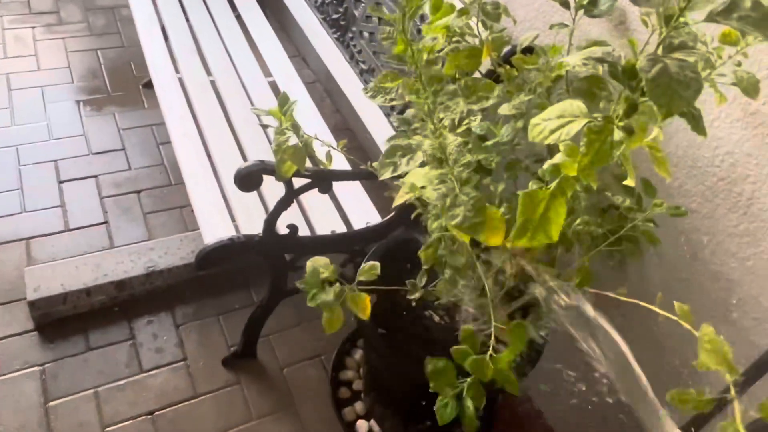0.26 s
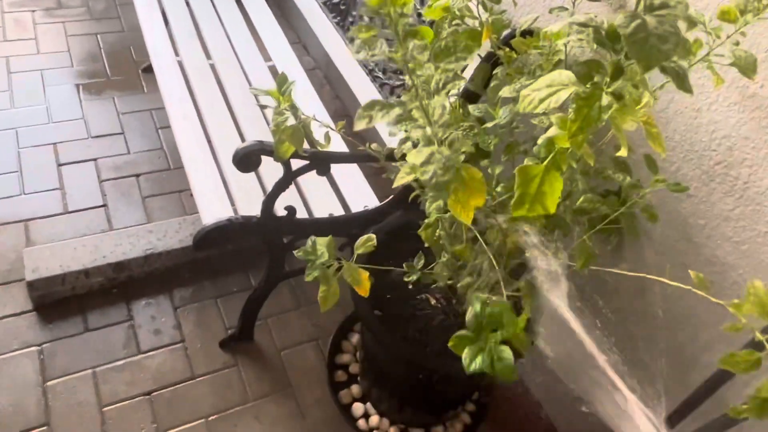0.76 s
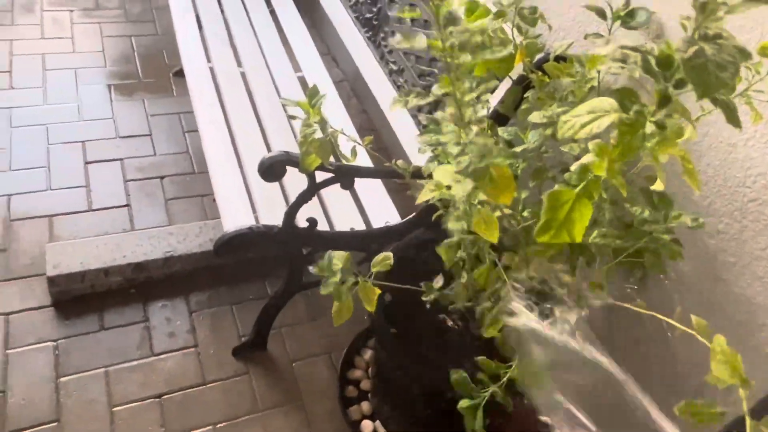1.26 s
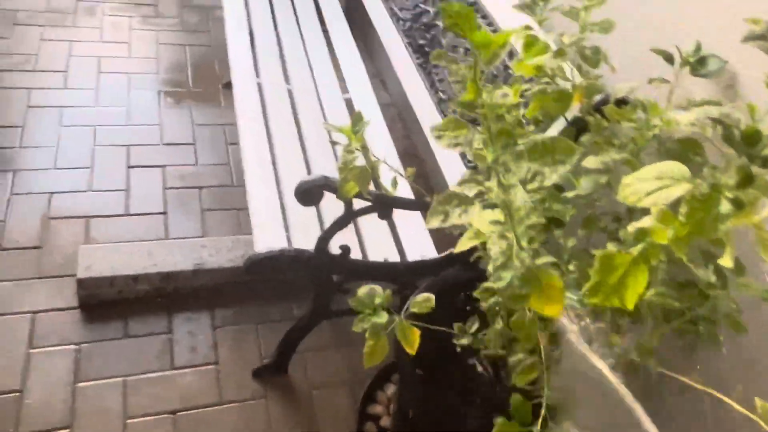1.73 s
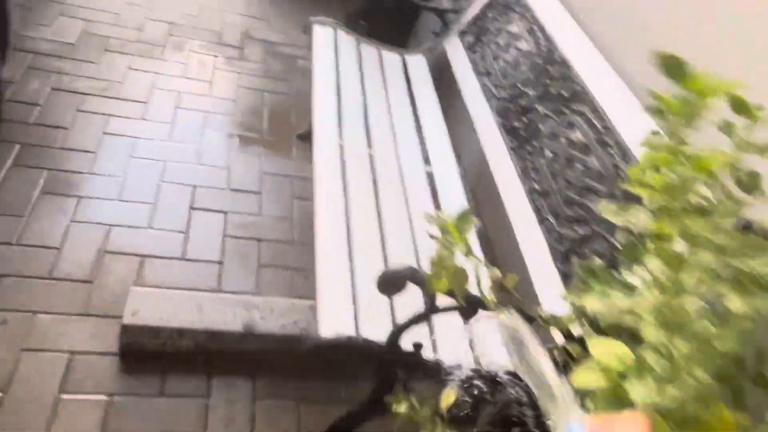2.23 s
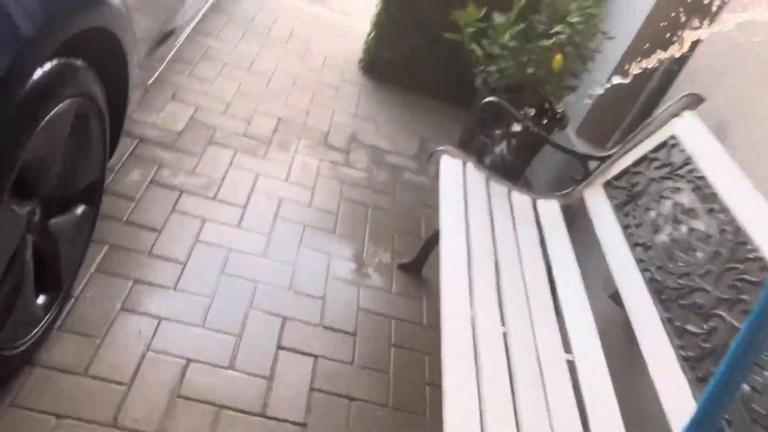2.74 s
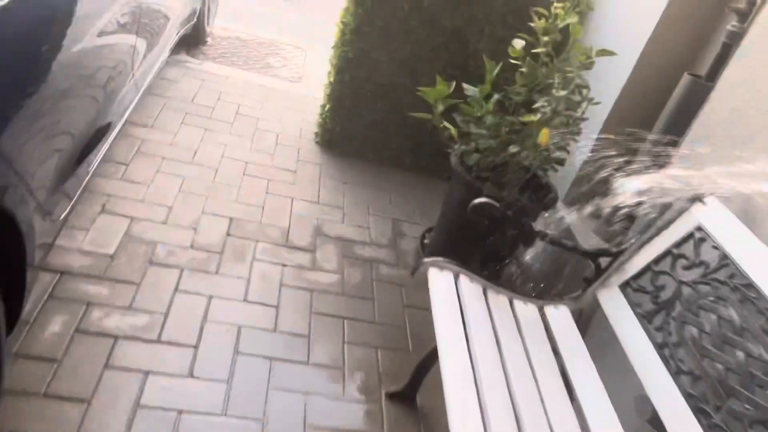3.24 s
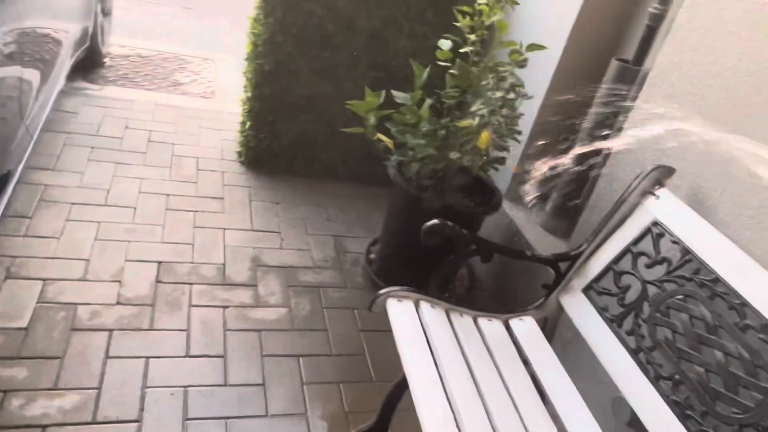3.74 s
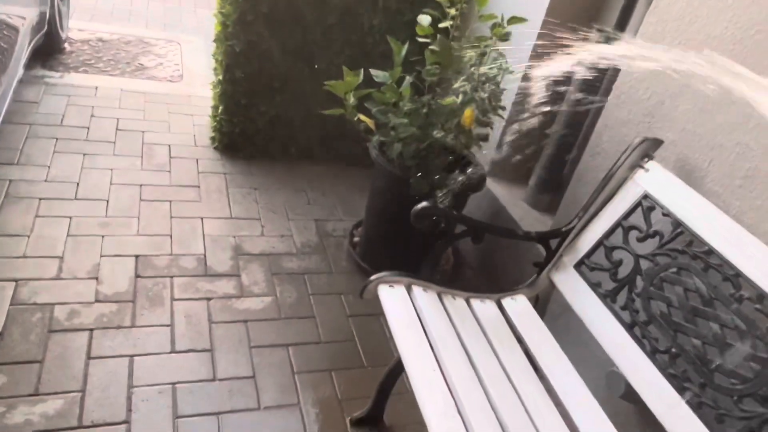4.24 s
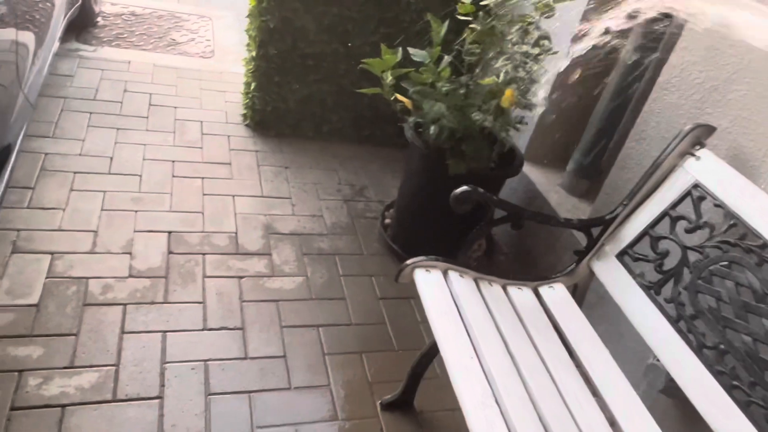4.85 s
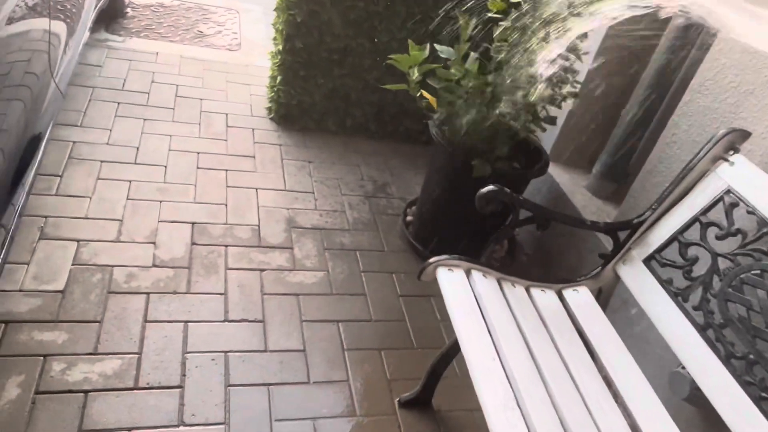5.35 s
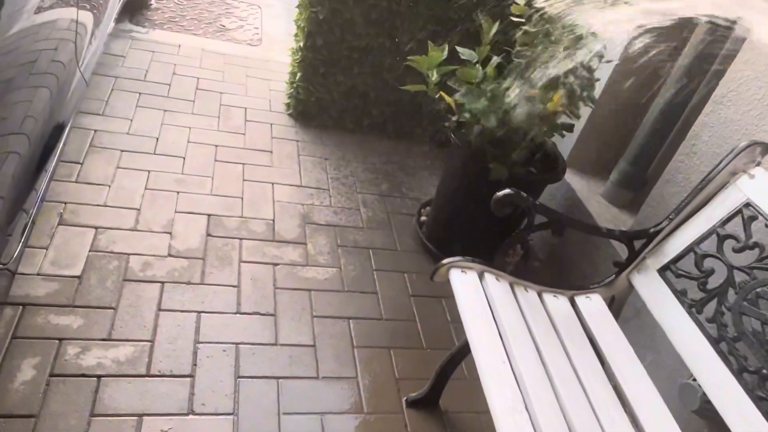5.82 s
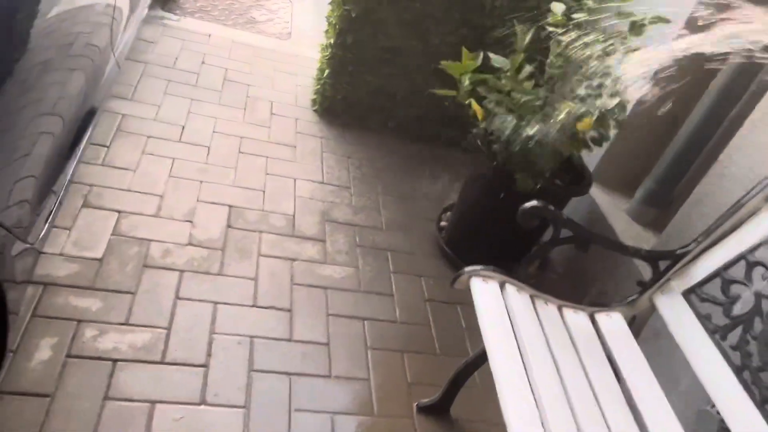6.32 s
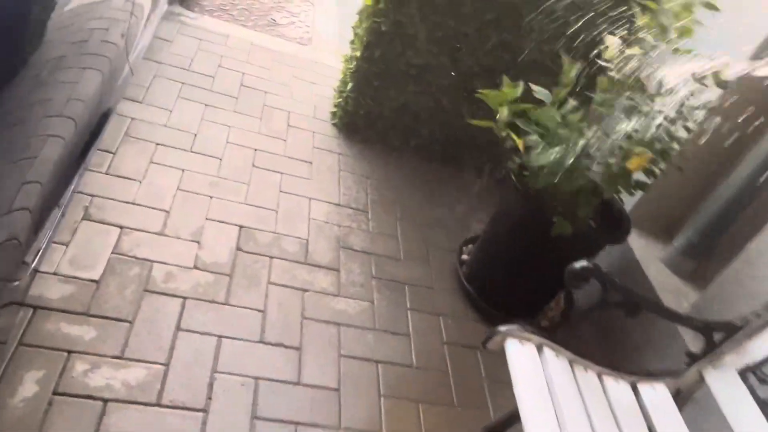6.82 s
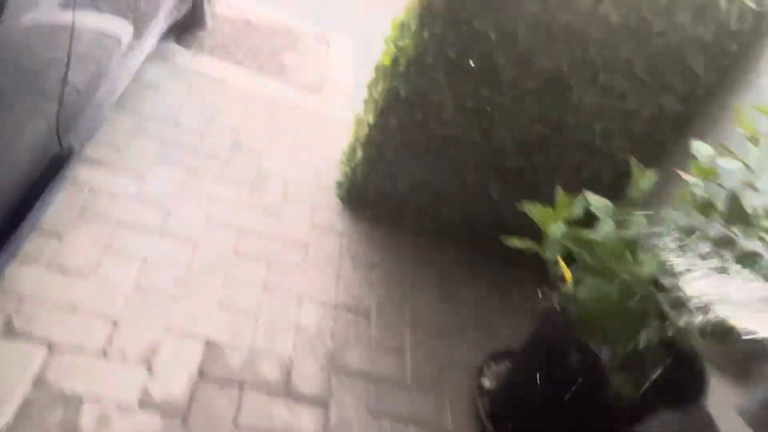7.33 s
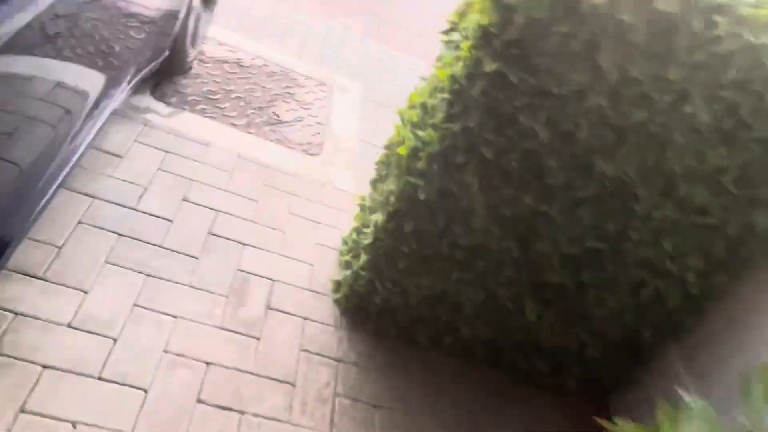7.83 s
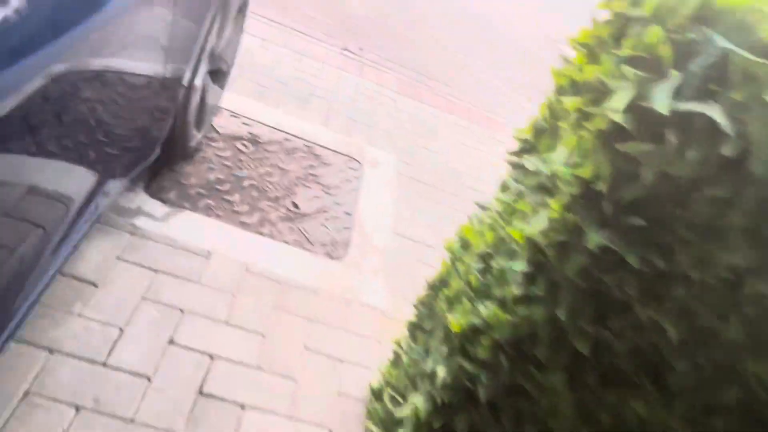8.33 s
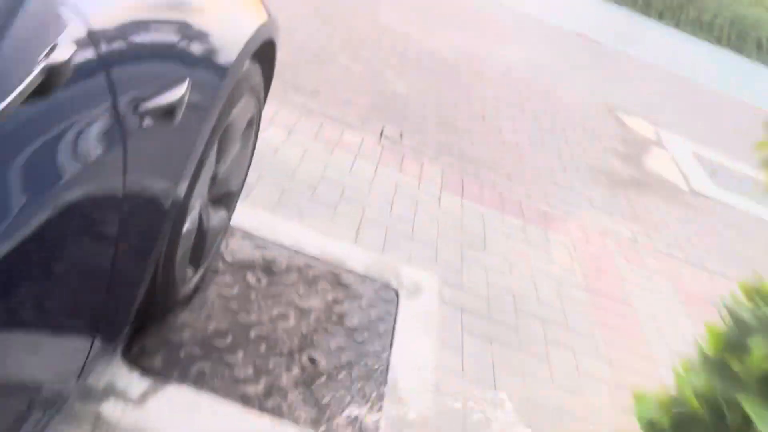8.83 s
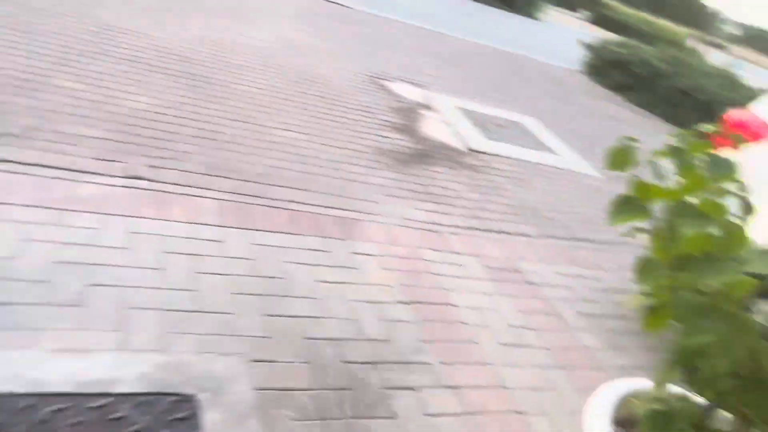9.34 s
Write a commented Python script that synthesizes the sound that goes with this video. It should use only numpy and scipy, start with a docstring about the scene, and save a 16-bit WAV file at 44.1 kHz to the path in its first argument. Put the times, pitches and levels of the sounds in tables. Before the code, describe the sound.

Close hand-held stereo on a hard-walled patio: a hose stream patters on leaves, drums on potted soil and splashes paving. Sharp leaf slaps cluster in the first second, the water thins, then short gushes and bubbly gurgles follow at a second pot. Near the end heavy drops tick on leaves close by. Underneath lie an unsteady deep motor hum, low street rumble, faint distant hoots and a few soft microphone bumps.

```python
"""Water patters and slaps on leaves, drums on soil and splashes on paving: a hose moves from pot to pot.
Drops are noise bursts, bubbles are short rising sines, slaps are cracks with a leaf ring, and pots are
ringing modes. A machine hums in unsteady sines, over low street noise and faint far-off hoots.
Soft bumps on the hand-held stereo microphone are dull pulses with a wobble and a rub."""
import sys
import numpy as np
from scipy import signal
from scipy.fft import rfft, irfft, next_fast_len
from scipy.io import wavfile

SR = 44100
rng = np.random.default_rng(int(sys.argv[2]) if len(sys.argv) > 2 else 0)


def materialize(psi):
    """Save the field psi as 16-bit PCM at rate SR to the path in sys.argv[1].

    A 1-D psi becomes a single channel; in a 2-D psi each row is a channel.
    """
    bounded = np.clip(np.atleast_2d(psi).T, -1, 1)
    quanta = np.round(bounded * 32767).astype(np.int16)
    wavfile.write(sys.argv[1], SR, quanta)


N = 422037
TIME = np.arange(N) / SR
PADDED = next_fast_len(N + SR)
BIN_HZ = np.maximum(np.arange(PADDED // 2 + 1) * SR / PADDED, 1)

# Levels are relative dB unless stated otherwise.
# Steady patter on leaves. Each row: time in seconds, level in dB.
PATTER_LEVEL = [(0, -43.5), (.8, -55), (1.8, -47), (2.35, -52.5), (2.47, -56.5), (3.0, -54.5), (3.4, -53.5),
                (4.55, -50.5), (5.1, -49.5), (5.55, -50.5), (6.7, -48.5), (7.8, -47), (8.03, -50.5),
                (8.57, -54), (8.75, -45.5), (9.57, -42)]
# Steady splash on hard ground. Each row: time in seconds, level in dB.
GROUND_LEVEL = [(0, -53), (1.8, -56), (2.65, -59), (3.5, -52), (4.6, -56), (5.6, -55.5), (7.5, -53.5),
                (8.15, -56), (9.57, -53.5)]
# Stream sweeping through a shrub. Each row: start in seconds, length in seconds, patter in dB,
# splash against patter in dB, spray against patter in dB.
SWEEPS = [(.11, 0.02, -43.5, -7, -15), (.3, 0.023, -43.5, -13, -3), (.375, 0.034, -41.5, -23, -14),
          (.47, 0.025, -44.5, -11, -11), (.54, 0.045, -45, -3.5, -18), (.625, 0.2, -44, -28, -7),
          (.9, 0.12, -46.5, -19, -2), (1.14, 0.15, -48.5, -6, -2.5), (1.44, 0.064, -49, -1.5, -6),
          (2.06, 0.031, -45, -27, -0.5), (2.19, 0.15, -42, -8.5, -8.5), (2.51, 0.062, -46.5, -23, -5.5),
          (2.722, 0.031, -38.5, -8.5, -8), (2.85, 0.11, -52, -3, -7), (3.072, 0.12, -40, -7.5, -8.5),
          (3.2, 0.15, -33.5, -7, -13), (3.38, 0.043, -42.5, 1.5, -11), (3.475, 0.036, -39.5, -1, -8),
          (3.68, 0.042, -40.5, -4.5, -7.5), (3.845, .13, -41, -7.5, -9.5), (4.055, 0.12, -40.5, -7, -7.5),
          (4.27, 0.082, -45, -3.5, -6.5), (4.75, 0.15, -51, -5.5, -8), (4.878, 0.059, -45, -1, -6),
          (4.97, 0.038, -42, -10, -6), (5.08, 0.022, -41.5, -5.5, -21), (5.7, 0.028, -43.5, -7.5, -8),
          (6.19, 0.059, -47.5, -4, -0.5), (6.32, 0.058, -42, -14, -6), (6.8, 0.092, -49.5, -9, -4.5),
          (6.97, 0.071, -57, -4, 6), (7.17, 0.048, -51, -3, 1.5), (7.25, 0.067, -50, -4, 3),
          (7.3, 0.095, -41.5, -6.5, -18), (7.63, 0.12, -40.5, -11, -9.5), (7.86, 0.077, -44.5, -8, -11),
          (8.085, 0.044, -39, -17, -7), (8.22, 0.081, -39.5, -8.5, -6.5), (8.35, 0.069, -40.5, -5, -0.5),
          (8.425, 0.045, -39.5, -6.5, -20), (8.59, 0.055, -37.5, -17, -2)]
SWEEP_ATTACK_S, SWEEP_FALL_DB_PER_S = 0.02, 138
SPRAY_VS_PATTER_DB, FLUTTER_SPREAD_DB, FLUTTER_HZ = -5.5, 0.5, 39
# Steady trickle into pots. Each row: time in seconds, drumming on earth in dB, sploshing in pools in dB.
SOIL_LEVELS = [(0, -46, -47.5), (.7, -50, -50), (1.1, -47.5, -49), (2.35, -49.5, -48.5),
               (2.65, -53.5, -58.5), (3.15, -53, -47), (4.35, -55, -46), (4.65, -53, -64.5),
               (5.0, -53, -54), (6.0, -53, -57), (7.05, -51.5, -54), (7.9, -49.5, -53), (8.7, -56.5, -81),
               (9.57, -57.5, -74)]
# Full stream plunging into a pot. Each row: start in seconds, length in seconds, drumming in dB,
# sploshing against drumming in dB.
PLUNGES = [(1.15, 0.11, -53.5, 6), (1.38, 0.058, -45, -4), (1.69, 0.045, -49, -1), (2.86, 0.17, -59.5, 10),
           (3.34, 0.056, -62, 9), (3.68, 0.041, -44.5, -2), (3.9, 0.052, -52.5, 12.5),
           (4.09, 0.088, -53, 9.5), (4.27, 0.19, -55, 8.5), (6.37, 0.071, -50.5, -12),
           (7.17, 0.17, -47.5, -5), (7.47, 0.027, -58.5, 9), (7.63, 0.11, -51, 5.5), (8.25, 0.13, -55, 6),
           (8.42, 0.05, -44.5, -1)]
PLUNGE_ATTACK_S, PLUNGE_FALL_DB_PER_S = 0.0077, 215
# Hollow dug in pooled water, lower when deep. Each row: time in seconds, resonance in Hz.
HOLLOW_PITCH = [(0, 900), (2.89, 880), (2.98, 1150), (3.13, 1450), (3.6, 1250), (3.74, 1060), (3.96, 1310),
                (4.08, 1200), (4.14, 830), (4.21, 1100), (4.37, 980), (4.6, 1150)]
HOLLOW_WIDTH_HZ, HOLLOW_WANDER_RATIO, HOLLOW_VS_SPLOSH_DB = 395, .04, -4
# Gouts slapping leaves and, near the end, heavy single drops ticking on leaves.
# Each row: start in seconds, level in dB, leaf ring in Hz, scattered droplets against the crack in dB.
SLAPS = [(.132, -26, 5200, 8), (.1915, -29, 9200, 2), (.317, -26.5, 4100, 9), (.3848, -19.5, 4500, 9),
         (.5417, -18, 4100, 4), (.5505, -22, 4000, 2), (.5651, -19.5, 4200, 4), (.574, -24, 3700, 4),
         (.6372, -17, 5200, 4), (.6495, -23, 4700, 2), (.683, -23, 4600, 2), (.7255, -27, 4000, 0),
         (.744, -28, 4400, 2), (.9203, -20, 8600, 6), (1.4865, -25, 8000, 0), (1.8472, -26, 6500, -2),
         (2.1949, -25, 4800, 6), (2.212, -24, 10000, 0), (2.547, -31, 4500, 8), (2.58, -30, 4400, 9),
         (2.6993, -29, 6000, 7), (2.7257, -19.5, 4400, 8), (2.77, -24, 4200, 9), (3.2126, -18, 4150, 7),
         (3.3099, -21, 4000, 13), (6.3525, -25, 5400, 6), (7.6525, -17, 7400, 7), (8.0726, -23, 5300, 8),
         (8.1135, -22, 4130, 6), (8.128, -24, 3000, 3), (8.2072, -29, 4300, 7), (8.3644, -23, 4700, 7),
         (8.379, -20, 2500, 0), (8.3873, -14.5, 2750, 2), (8.404, -23, 3600, 2), (8.5819, -26, 5000, 8),
         (8.6733, -23, 3300, 0), (8.7299, -21, 5150, 0), (8.7801, -25, 4100, 0), (8.8313, -22, 4150, 3),
         (8.8631, -24, 3400, 2), (8.9321, -17, 5800, 5), (8.9806, -25, 3200, -3), (8.989, -19.5, 3200, -3),
         (9.0445, -25, 3050, 0), (9.0538, -17.5, 4700, 2), (9.0986, -23, 5900, 0), (9.1885, -19, 2600, 4),
         (9.2643, -16, 5900, 0), (9.2953, -18.5, 3000, 3), (9.3422, -18.5, 9000, -2),
         (9.3635, -21, 5750, 0), (9.3841, -20.5, 3600, 3), (9.4351, -24, 3800, 0), (9.4917, -22, 5300, 0),
         (9.5106, -22, 5700, 0), (9.5437, -20, 3300, 3)]
# Stream striking a pot, and one light tick at 9.07 s. Each row: start in seconds, level in dB, lower band edge
# in Hz, # upper band edge in Hz, hard push against the splat in dB.
KNOCKS = [(.393, -31, 1000, 2000, 0), (.4, -29, 950, 1900, 3), (.418, -32, 900, 2100, 0),
          (.468, -35, 650, 1250, 3), (2.3505, -30.5, 380, 1500, 27), (2.3542, -28, 500, 1350, 30),
          (2.36, -29, 330, 1300, 8), (2.377, -33.5, 560, 1450, 12), (2.898, -29, 750, 1050, 24),
          (2.920, -32, 850, 1700, 14), (8.436, -34, 500, 2600, 17), (9.072, -36, 620, 880, 24)]
# Modes of a pot, lowest first. Each row: frequency in Hz, level in dB, 60 dB decay in seconds.
POT_MODES = [(335, -7.5, 0.53), (420, -16, 0.0068), (554, -28, 0.024), (816, 18, 0.01), (1080, 19, 0.0093)]
# Lowest pot mode driven by the stream. Each row: start in seconds, length in seconds, peak in dB.
BOOMS = [(1.38, 0.14, -44), (1.593, 0.14, -51), (1.875, 0.087, -49), (4.37, 0.044, -44), (7.185, .14, -51)]
# Broad leaf buzzing under the stream. Each row: start in seconds, length in seconds, peak in dB, ring in Hz.
BUZZES = [(0.539, 0.059, -39, 3660), (3.27, .12, -36, 3910), (3.478, 0.071, -51, 2960),
          (4.949, 0.13, -39, 3560), (8.365, 0.12, -42, 2380)]
BUZZ_WIDTH_HZ, BUZZ_SAG_OCTAVES = 810, 0.27
# Big bubbles in the pots. Each row: start in seconds, level in dB, starting pitch in Hz.
PLOPS = [(2.897, -35, 860), (3.353, -39, 1027), (3.723, -35, 1030), (3.938, -30, 1190), (4.125, -35, 736),
         (4.32, -33, 895), (8.434, -23, 2050)]
# cycles are those of the starting pitch during a 60 dB fall
PLOP_ATTACK_S, PLOP_CYCLES, PLOP_PHASE_STRETCH = .002, 52, 0.18
# Heavy single drops on the hedge close by. Each row: time in seconds, level in dB.
HEDGE_LEVEL = [(0, -90), (8.5, -86.5), (8.7, -39), (9.57, -32)]
# Bumps on the microphone. Each row: start in seconds, level in dB, softness of the push in seconds.
BUMPS = [(2.264, -33.5, 0.0042), (7.814, -33, 0.0041), (9.076, -37, 0.0023), (9.1385, -21.5, 0.0024)]
WOBBLE_HZ, WOBBLE_PEAK_S, RUB_DB = 58, .026, -19
# Machine hum. Each row: time in seconds, deep hum in dB, upper hum in dB.
HUM_LEVELS = [(0, -49, -57), (.6, -49, -50), (.95, -48, -53), (1.15, -50, -49.5), (1.6, -44, -47),
              (1.98, -52, -53.5), (2.21, -51, -45), (2.45, -52, -56), (3.4, -40, -75), (4.95, -39, -54),
              (5.7, -40, -74), (6.95, -38, -73), (7.25, -35, -52), (8.4, -35.5, -60), (9.15, -38.5, -67),
              (9.57, -44.5, -54)]
THROB_PERIOD_S, THROB_CREST_S, THROB_DB = 0.765, 4.22, 1.4
# Second drone beating against the hum. Each row: time in seconds, pitch in Hz, level in dB.
DRONE = [(0, 72.7, -66), (.3, 77.3, -48), (.55, 82, -58), (.9, 78.9, -63), (1.18, 76.5, -48),
         (1.55, 74.2, -51), (1.9, 72.6, -66), (3, 74, -90)]
# Faint far-off hoots, perhaps a dove. Each row: start in seconds, length in seconds, pitch in Hz, peak in dB.
HOOTS = [(.1, 0.3, 542, -51.5), (1.12, 0.14, 534, -44.5), (1.84, 0.13, 548, -47.5),
         (5.141, 0.2, 557, -51.5), (8.555, 0.21, 552, -49.5), (8.93, 0.35, 527, -56.5),
         (8.89, 0.2, 204.3, -46)]
# Street rumble. Each row: time in seconds, level in dB.
STREET_LEVEL = [(0, -51), (2.6, -52.5), (4.5, -50.5), (7, -50), (9, -47), (9.57, -50)]
# Spectra of the layers. Each row: frequency in Hz, gain in dB.
SOIL_COLOUR = [(120, -6), (240, -5.5), (350, 0.5), (550, 1.5), (750, -4.5), (1100, -45), (2500, -15)]
POOL_COLOUR = [(350, -4.5), (650, -7), (850, -1.5), (1100, -8.5), (1400, 2.5), (1800, -1), (3000, -9)]
SPLASH_COLOUR = [(700, -11.5), (1300, 1), (1800, 1.5), (2300, 3), (2900, 3), (3900, 1.5), (7000, -23)]
LEAF_COLOUR = [(1500, -27), (2600, -11), (3400, -3.5), (4300, 4), (5400, 2), (6500, -4.5), (8500, -10.5),
               (14000, -18)]
SPRAY_COLOUR = [(3500, -24.5), (6000, -0.5), (7500, 3), (9000, 1), (11000, 2.5), (13000, -6), (15500, -4)]
HEDGE_COLOUR = [(800, -20), (1600, -6.5), (2700, -4.5), (5500, 1.5), (10000, -2), (15000, 2.5)]
STREET_COLOUR = [(20, -25), (40, -0.5), (70, 4.5), (125, 2.5), (175, -2), (240, -7.5), (320, -18.5),
                 (430, -13.5), (1000, -26), (4000, -39)]
# Reflections from walls and paving. Each row: frequency in Hz, level against the direct sound in dB.
REFLECTED = [(150, -21), (500, -5.5), (1000, -1.5), (2000, 7), (5000, 6), (6500, 4), (7800, -4),
             (9000, -12), (16000, -6)]
LATE_SHARE, LATE_S = 0.48, 0.035
WALL_DELAY_S, WALL_SWAY_S, WALL_DB = .0042, 0.00027, -12.5
# Phase difference between left and right. Each row: frequency in Hz, lead of the left in radians.
STEREO_PHASE = [(50, 0), (1000, -1.1), (4200, -3.3), (5400, -6.3), (6400, -9.4), (8300, -12.2),
                (10000, -12.8), (12000, -15.5), (13600, -15.9), (15400, -18.7)]
# Balance between left and right. Each row: frequency in Hz, left minus right in dB.
STEREO_BALANCE = [(100, 1.5), (1000, 0), (1700, 3), (3200, 2), (4000, 11), (4700, 8), (5700, 9), (6800, -1),
                  (9000, -0.5)]
CUTOFF_HZ = 15900


def stream():
    """The stream breaks up into leaf patter, ground splash and fine spray, with gushes added by power."""
    patter, ground = gains(PATTER_LEVEL)[0], gains(GROUND_LEVEL)[0]
    flutter = from_db(-FLUTTER_SPREAD_DB * drift(FLUTTER_HZ))
    steady = np.array([patter, ground, from_db(SPRAY_VS_PATTER_DB) * patter]) * flutter
    sweeps = gushes(SWEEPS, SWEEP_ATTACK_S, SWEEP_FALL_DB_PER_S)
    leaves, splash, spray = np.sqrt(steady ** 2 + sweeps)
    on_ground = drops(900, 2.2, 2.2, 0.003) + from_db(-24.0) * bubbles(1460, 3740, 35, count=1500)
    on_leaves = drops(1200, 4.2, 4.4, 0.019) + from_db(-16.0) * bubbles(3330, 6090, 54, count=1800)
    fine = drops(1600, 3.4, 1.8, 0.0062)
    return (from_db(4.5) * splash * coloured(on_ground, SPLASH_COLOUR)
            + from_db(3.0) * leaves * coloured(on_leaves, LEAF_COLOUR)
            + from_db(7.5) * spray * coloured(fine, SPRAY_COLOUR))


def soil():
    """Heavy drops thud into earth, faintly ring the pot, and gurgle and splosh in pooled water."""
    plunges = gushes(PLUNGES, PLUNGE_ATTACK_S, PLUNGE_FALL_DB_PER_S)
    earth, pool = np.sqrt(np.square(gains(SOIL_LEVELS)) + plunges)
    thuds = drops(500, 3.7, 3.0, 0.016)
    drumming = coloured(thuds, SOIL_COLOUR) + from_db(-8.5) * rms_one(pot(thuds))
    drumming = drumming + from_db(-9) * bubbles(300, 620, 22, count=600)
    sploshes = drops(1400, 1.3, 3, 0.003) + from_db(-10) * bubbles(640, 1500, 26, count=2600)
    hollow_hz = np.interp(TIME, *np.transpose(HOLLOW_PITCH)) * np.exp(HOLLOW_WANDER_RATIO * drift(6))
    gurgle = from_db(HOLLOW_VS_SPLOSH_DB) * resonance(hollow_hz, HOLLOW_WIDTH_HZ)
    pooled = coloured(sploshes, POOL_COLOUR) + gurgle
    return from_db(1.5) * earth * drumming + from_db(-0.74) * pool * pooled


def slaps():
    """A gout or heavy drop cracks on a leaf, the leaf rings briefly, and droplets scatter after it."""
    out, t = np.zeros((3, N)), TIME[:SR // 6]
    for s, db, ring_hz, droplets_db in SLAPS:
        crack = np.exp(-2 * t / .0026)
        landed = rng.random(len(t)) < 1200 / SR
        droplets = landed * rng.exponential(1, len(t)) * np.exp(-2 * t / .028)
        energy = crack + from_db(droplets_db) * lingering(droplets, 0.0013)
        burst = spatter(energy, late=0)
        burst[:, 0] += 3  # the first hard contact
        leaf = bandpass(burst, 1, ring_hz / 1.18, ring_hz * 1.18)
        # a small, high-pitched leaf takes in a wider band of the burst, but radiates less
        slap = from_db(-6.5) * burst + from_db(7.5) * np.sqrt(4500 / ring_hz) * leaf
        add(out, s, from_db(db - 4.5) * highpass(slap, 3, 2300))
    return out


def knocks():
    """The full stream hits a pot's wall with a hard push and a short wet splat that ring it; one light tick is
    made the same way."""
    push, t = np.zeros((3, N)), TIME[:SR // 6]
    for s, db, low_hz, top_hz, hard_db in KNOCKS:
        splat = from_db(-3) * spatter(np.exp(-2 * t / .011), late=.1)
        splat[0, 0] += from_db(hard_db)
        add(push, s, from_db(db) * bandpass(splat, 2, low_hz, top_hz))
    return from_db(-49) * pot(push) + from_db(11.5) * push


def buzzes():
    """A broad leaf rings under the stream, lower as the water weighs it down."""
    out = np.zeros((3, N))
    for s, length_s, db, ring_hz in BUZZES:
        along = np.linspace(0, 1, int(length_s * SR))
        pitch_hz = ring_hz * 2 ** (BUZZ_SAG_OCTAVES * (.5 - along))
        add(out, s, from_db(db) * np.sin(np.pi * along) * resonance(pitch_hz, BUZZ_WIDTH_HZ))
    return out


def booms():
    """The pot's lowest mode swells and fades while the stream drives it."""
    out, mode_hz = np.zeros((3, N)), POT_MODES[0][0]
    for s, length_s, db in BOOMS:
        t = TIME[:int(length_s * SR)]
        tone = np.sin(2 * np.pi * (mode_hz * t + rng.random((3, 1))))
        add(out, s, from_db(db) * np.sin(np.pi * t / length_s) * tone)
    return out


def plops():
    """A big bubble rings and rises in pitch as it nears the surface."""
    out, t = np.zeros((3, N)), TIME[:SR // 5]
    for s, db, hz in PLOPS:
        age = t * hz / PLOP_CYCLES
        phases = rng.random((3, 1))
        shape = np.minimum(t / PLOP_ATTACK_S, 1) * from_db(db - 60 * age)
        cycles = hz * t * (1 + PLOP_PHASE_STRETCH * age)
        add(out, s, shape * np.sin(2 * np.pi * (cycles + phases)))
    return out


def hedge():
    """Close by, single heavy drops tick on stiff leaves at many pitches."""
    ticks = drops(110, 2.0, 2.5, 0.0015) + from_db(-2) * bubbles(2300, 9500, 22, count=900)
    return gains(HEDGE_LEVEL)[0] * coloured(ticks, HEDGE_COLOUR)


def bumps():
    """The hand nudges the microphone: a dull pulse, a short wobble and a low rub, without the deepest bass."""
    out, t = np.zeros(N), TIME[:SR // 5]
    for s, db, soft_s in BUMPS:
        along = t / soft_s - 3
        pulse = (1 - along ** 2) * np.exp(-along ** 2)
        rub = rms_one(bandpass(rng.standard_normal(len(t)), 2, 60, 150))
        swell = t / WOBBLE_PEAK_S * np.exp(1 - t / WOBBLE_PEAK_S)
        wobble = .55 * np.sin(2 * np.pi * WOBBLE_HZ * t)
        add(out, s, -from_db(db) * (1.7 * pulse + swell * (wobble + from_db(RUB_DB) * rub)))
    return highpass(out, 2, 40)


def machine():
    """A motor's throbbing deep hum, tones above it, now louder, now nearly silent, and a beating drone."""
    deep, upper = gains(HUM_LEVELS)
    throb = from_db(THROB_DB * np.cos(2 * np.pi * (TIME - THROB_CREST_S) / THROB_PERIOD_S))
    s, drone_hz, drone_db = np.transpose(DRONE)
    drone_gain = from_db(np.interp(TIME, s, drone_db))
    drone = drone_gain * unsteady_tone(np.interp(TIME, s, drone_hz), 0.31, 1.7)
    low_tone = unsteady_tone(52.4, 0.44, 0.63)
    upper_tones = unsteady_tone(87.2, 0.93, 2.8) + from_db(-12.5) * unsteady_tone(146, 0.87, 3.1)
    return throb * deep * low_tone + upper * upper_tones + drone


def hoots():
    """Soft pure notes that swell, arch in pitch and sink away."""
    out = np.zeros(N)
    for s, length_s, hz, db in HOOTS:
        along = np.linspace(0, 1, int(length_s * SR))
        pitch_hz = hz * (1 - 0.053 * (along - .35) ** 2)
        note = np.sin(2 * np.pi * np.cumsum(pitch_hz) / SR)
        add(out, s, from_db(db) * np.sin(np.pi * along) * note)
    return out


def street():
    """Low rumble: coloured noise, partly shared between left and right."""
    noise = rng.standard_normal(N) + 0.53 * rng.standard_normal((2, N))
    return gains(STREET_LEVEL)[0] * coloured(noise, STREET_COLOUR)


def wall(x):
    """One near echo on each path; its delay sways, so the colour of the water keeps shifting."""
    gain = from_db(WALL_DB)
    echo = np.array([np.interp(TIME - WALL_DELAY_S - WALL_SWAY_S * drift(0.74), TIME, row) for row in x])
    return (x + gain * echo) / np.sqrt(1 + gain ** 2)


def patio(x):
    """The direct sound is out of step between left and right; reflections from the walls differ at each."""
    spectra = rfft(x, PADDED)
    wet, balance = from_db(over_hz(REFLECTED)), from_db(over_hz(STEREO_BALANCE))
    direct = spectra[0] * np.exp(.5j * over_hz(STEREO_PHASE) * np.array([[1], [-1]]))
    sides = np.array([balance, np.ones_like(balance)]) * np.sqrt(2 / (1 + balance ** 2))
    mixed = (direct + wet * spectra[1:]) / np.sqrt(1 + wet ** 2)
    return irfft(sides * mixed, PADDED)[:, :N]


def drops(per_s, spread_db, clump_db, burst_s):
    """Drops of uneven size land in clumps; each bursts in a brief dying spit of noise."""
    landed = rng.random(N) < per_s * from_db(clump_db * drift(35)) / SR
    sizes = from_db(spread_db * np.minimum(rng.exponential(1, N), 5.5))
    return rms_one(spatter(lingering(landed * sizes ** 2, burst_s), LATE_SHARE))


def bubbles(low_hz, high_hz, cycles, count):
    """Trapped air rings for a few cycles, each bubble at its own slightly rising pitch."""
    out, t = np.zeros((3, N)), TIME[:SR // 30]
    for when, pitch, size, *paths in rng.random((count, 6)):
        hz = low_hz * (high_hz / low_hz) ** pitch
        age = t * hz / cycles
        plink = from_db(10 * size - 60 * age) * np.sin(2 * np.pi * hz * t * (1 + 0.08 * age))
        path_gains = np.cos(2 * np.pi * np.array(paths))
        add(out, when * TIME[-1], np.outer(path_gains, plink))
    return rms_one(out)


def gushes(rows, attack_s, fall_db_per_s):
    """Power of gushes that swell, hold and die away: one curve for each part."""
    power, t = np.zeros((len(rows[0]) - 2, N)), TIME[:SR]
    for s, length_s, db, *against_db in rows:
        fall = from_db(-fall_db_per_s * np.maximum(t - length_s, 0))
        shape = np.minimum(t / attack_s, 1) * fall
        part_gains = from_db(db + np.array([0, *against_db]))
        add(power, s, np.outer(part_gains, shape) ** 2)
    return power


def spatter(energy, late):
    """Noise following an energy curve, in three rows: direct, and reflected to the left and to the right."""
    late = np.clip(late, 0, 1)
    reflected = (1 - late) * energy + late * lingering(energy, LATE_S)
    return np.sqrt([energy, reflected, reflected]) * rng.standard_normal((3, len(energy)))


def lingering(energy, decay_s):
    """Spread energy over an exponential tail whose amplitude falls by 1/e in decay_s."""
    keep = np.exp(-2 / (decay_s * SR))
    return signal.lfilter([1 - keep], [1, -keep], energy + 1e-18)


def pot(push):
    """A pot full of earth rings in its modes, with alternating signs."""
    modes = enumerate(POT_MODES)
    return sum((-1) ** k * from_db(db) * ring(push, hz, t60_s) for k, (hz, db, t60_s) in modes)


def ring(push, hz, t60_s):
    """Two-pole resonance: a unit click sets a decaying sine ringing."""
    r, w = from_db(-60 / (t60_s * SR)), 2 * np.pi * hz / SR
    return signal.lfilter([0, np.sin(w)], [1, -2 * r * np.cos(w), r * r], push + 1e-18)


def resonance(hz, width_hz):
    """Noise ringing in a resonance that follows a pitch curve, in three rows; rms 1."""
    lowpass = signal.butter(2, width_hz / 2, fs=SR, output="sos")
    wobble = signal.sosfilt(lowpass, rng.standard_normal((2, 3, len(hz))))
    turn = 2 * np.pi * np.cumsum(hz) / SR
    return rms_one(wobble[0] * np.cos(turn) + wobble[1] * np.sin(turn))


def unsteady_tone(hz, wander_hz, waver_db):
    """A sine unsteady in pitch and level."""
    level = np.sqrt(2) * from_db(waver_db * drift(5.1))
    return level * np.sin(2 * np.pi * np.cumsum(hz + wander_hz * drift(2.9)) / SR)


def drift(rate_hz):
    """Slow random wander of rms 1: noise through two equal poles, at a fortieth of the sample rate."""
    r = np.exp(-80 * np.pi * rate_hz / SR)
    noise = rng.standard_normal(N // 40 + 2002)
    slow = signal.lfilter([1], [1, -2 * r, r * r], noise)[2000:]  # drop the run-in
    return np.interp(np.arange(N) / 40, np.arange(len(slow)), rms_one(slow))


def coloured(x, colour):
    """Filter a sound by a spectrum table; rms 1."""
    return rms_one(irfft(rfft(x, PADDED) * from_db(over_hz(colour)), PADDED)[..., :N])


def over_hz(points):
    """Join a table's points on a log-frequency axis."""
    hz, value = np.transpose(points)
    return np.interp(np.log(BIN_HZ), np.log(hz), value)


def gains(rows):
    """One gain curve for each dB column."""
    s, *columns = np.transpose(rows)
    return [from_db(np.interp(TIME, s, column)) for column in columns]


def bandpass(x, order, low_hz, high_hz):
    """Butterworth band-pass."""
    return signal.sosfilt(signal.butter(order, [low_hz, high_hz], "band", fs=SR, output="sos"), x)


def highpass(x, order, hz):
    """Butterworth high-pass."""
    return signal.sosfilt(signal.butter(order, hz, "high", fs=SR, output="sos"), x)


def from_db(db):
    """Decibels to gain."""
    return 10 ** (np.asarray(db) / 20)


def rms_one(x):
    """Scale to rms 1."""
    return x / np.sqrt(np.mean(x ** 2) + 1e-20)


def add(track, s, sound):
    """Mix a sound into a track at a time."""
    start = round(s * SR)
    track[..., start:start + sound.shape[-1]] += sound[..., :N - start]


def scene():
    """Water on the patio over street, machine and hoots, with bumps on the microphone."""
    water = wall(stream() + soil()) + hedge() + buzzes() + plops() + booms() + slaps() + knocks()
    at_patio = patio(water)
    rest = street() + machine() + hoots() + bumps()
    return at_patio + rest * from_db([[.6], [-.6]])  # left slightly louder


def record(dry):
    """A steep elliptic low-pass cuts the top."""
    return signal.sosfilt(signal.ellip(10, .1, 80, CUTOFF_HZ, fs=SR, output="sos"), dry)


dry = scene()
out = record(dry)
materialize(out)
```